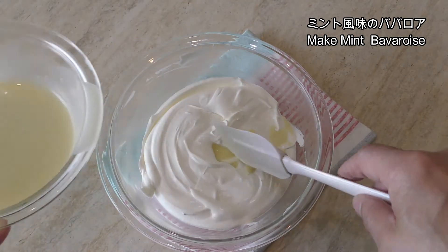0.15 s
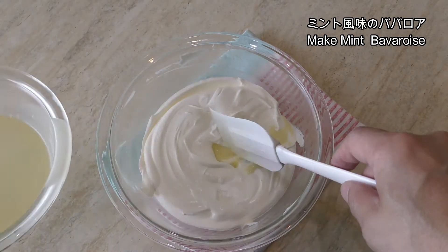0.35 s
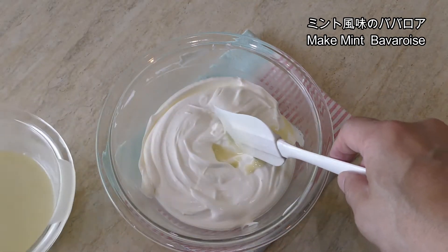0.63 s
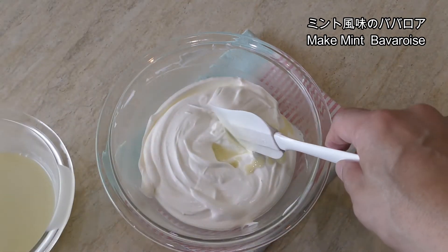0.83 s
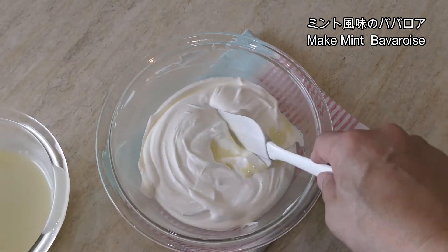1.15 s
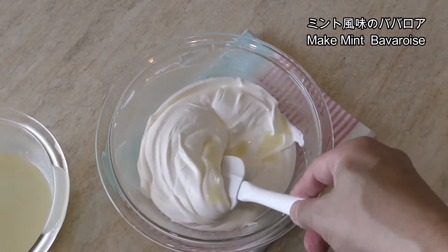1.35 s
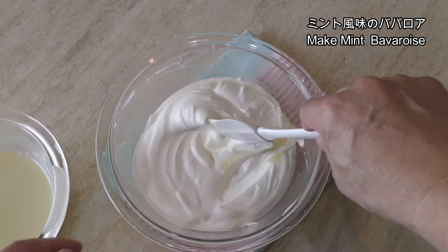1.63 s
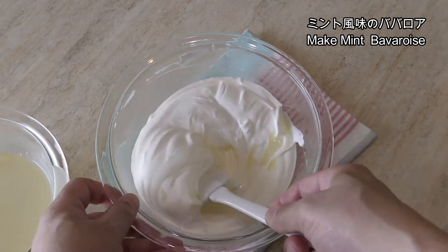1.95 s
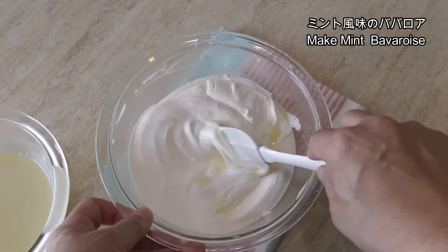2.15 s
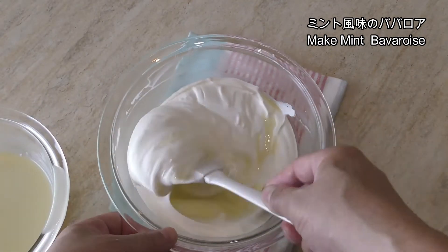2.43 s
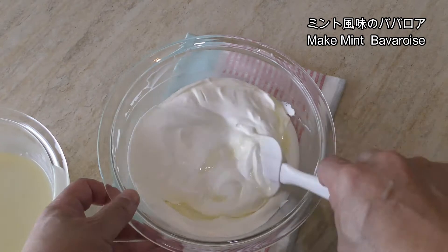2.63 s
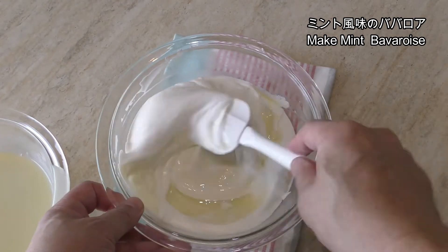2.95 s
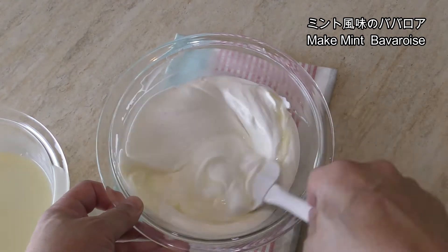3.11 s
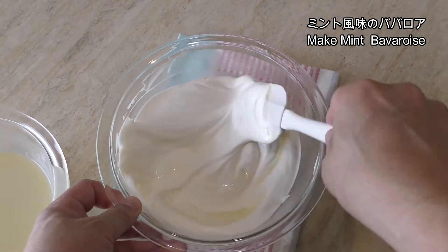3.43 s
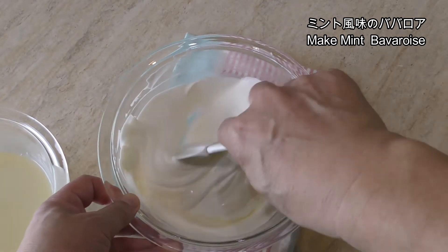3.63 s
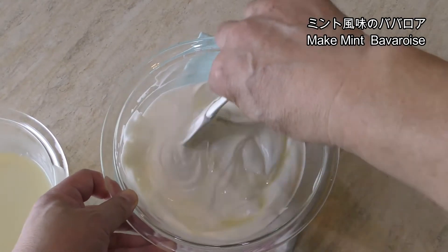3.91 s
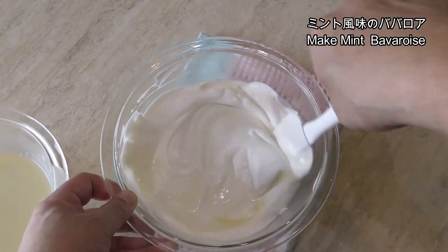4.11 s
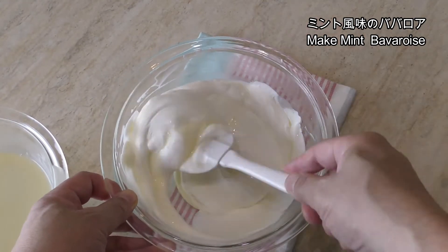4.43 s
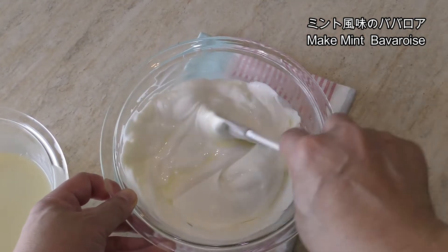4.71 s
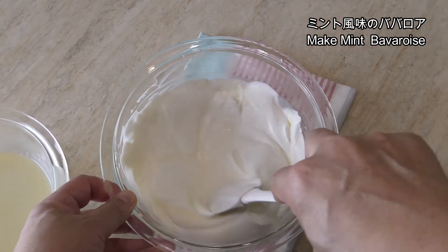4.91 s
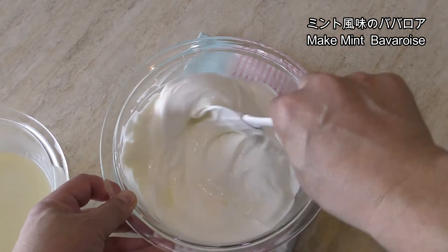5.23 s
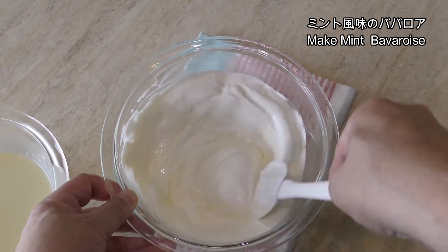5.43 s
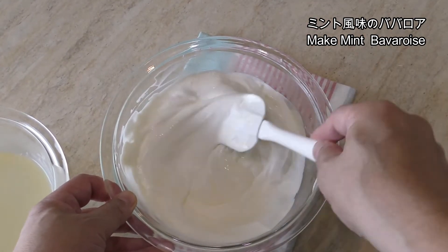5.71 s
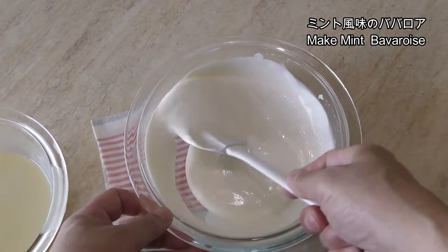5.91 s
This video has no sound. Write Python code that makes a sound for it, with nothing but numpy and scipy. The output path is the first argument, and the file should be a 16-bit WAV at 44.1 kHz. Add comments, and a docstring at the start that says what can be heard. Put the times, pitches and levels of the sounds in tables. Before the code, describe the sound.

A small kitchen, heard closely in stereo, with soft low room noise and a thin, faint appliance whine throughout. A barely audible knock fades at the start. At 0.74 s a glass bowl holding liquid lands on a hard counter with the loudest clack, a short glassy rattle and a low jolt; weaker contacts follow at 0.8 s, two faint foot scrapes at 0.9 and 1.0 s, and a second firm clack at 1.04 s. From 1.1 s a soft spatula makes dull, rounded thuds on a towel-cushioned bowl, around 1.7, 2.2, 2.7 and 3.1 s, among small skipping ticks. A faint rim brush comes at 1.9 s, bright short clinks at 2.7 and 3.16 s. Foamy swishes begin at 2.1 s. After 3.5 s it is sparser: drier, faint strokes, a tick at 4.6 s, bumps at 4.75 and 5.7 s, and a last wet swish near 5.9 s.

```python
"""In a kitchen, a glass bowl is set down on a counter; then a spatula folds whipped cream in a second glass bowl.
The landings and clinks are modal synthesis: impacts set decaying modes of glass and slab ringing.
The soft blade thuds on a bowl resting on a towel, as damped modes; the handle ticks, as short pulses.
The landed bowl's foot scrapes twice, then the cream swishes and crackles: random grains filtered into bands.
A small room answers each blow with echoes, standing waves and a diffuse tail; an appliance hums in it."""
import sys
import numpy as np
from scipy import signal
from scipy.fft import rfft, irfft, next_fast_len
from scipy.io import wavfile
from scipy.ndimage import uniform_filter1d, map_coordinates

SR = 44100
rng = np.random.default_rng(int(sys.argv[2]) if len(sys.argv) > 2 else 0)


def log_audio(samples):
    """Write samples as a 16-bit WAV file to the path given in sys.argv[1]."""
    # one column per channel
    frames = np.atleast_2d(samples).T
    # limit to full scale, then quantise
    limited = np.clip(frames, -1, 1)
    pcm = np.round(limited * 32767).astype(np.int16)
    wavfile.write(sys.argv[1], SR, pcm)


N = 267025  # length of the scene in samples

# low modes of the counter slab: (f/Hz, level/dB over the ring, t60/s)
COUNTER = [(143.3, 3, 0.23), (198, 6, 0.19)]


def slab_boom(t):
    """Modal decay: each low mode of the slab is a sine with an exponential envelope."""
    return sum(amp(db - 60 * t / t60) * np.sin(2 * np.pi * hz * t) for hz, db, t60 in COUNTER)


# spectrum of the dense ringing of glass and counter: (f/Hz, relative level/dB)
RATTLE = [(150, -30), (250, 7), (392, -1.5), (606, -5.5), (733, -9), (967, 3), (1350, -5.5), (1550, 1.5),
          (2150, -8.5), (2380, -8.5), (3200, -9.5), (4010, -14), (4450, -17), (12800, -31), (15800, -39)]


def rattle(t):
    """High modal density: many overlapping modes sound as decaying coloured noise."""
    # the foot of the bowl chatters in many small uneven contacts
    chatter = amp(2 * unit(uniform_filter1d(rng.standard_normal(len(t)), size=60)))
    noise = spread(rng.standard_normal((2, len(t))), [(300, 0.9), (2000, 0.58), (10000, 0.89)])
    return coloured(chatter * noise, RATTLE) * amp(3.0 - 60 * t / 0.22)


# spectrum of the low jolt: (f/Hz, relative level/dB)
SHUDDER = [(25, -22), (50, -13), (75, -2), (110, -5), (150, -1), (260, -24), (600, -70), (2000, -120)]


def shudder(t):
    """Negative correlation: a decaying low rumble, largely in opposition between left and right."""
    noise = spread(rng.standard_normal((2, len(t))), [(60, -0.55)])
    return coloured(noise, SHUDDER) * amp(-7.0 - 60 * t / 0.35)


# the bowl lands on the counter: (t/s, relative contact level/dB, relative ring level/dB)
LANDINGS = [(0.7434, -8, -29), (0.7894, -23, -42), (0.8109, -17.5, -33), (1.0443, -11.5, -28.5)]
# spectrum of the hard contact: (f/Hz, relative level/dB)
CONTACT = [(100, -22.5), (400, 2), (650, -16.5), (930, 5.5), (1600, -4.5), (2400, -6.5), (3200, -23.5),
           (4200, -17.5), (7000, -34), (15000, -32.5)]
# modes of the landed bowl, loaded with liquid: (f/Hz, relative level/dB, t60/s)
LANDED_GLASS = [(878, -5, 0.2), (980, -4, 0.12), (1150, -3.5, 0.32), (1286, -6, 0.19), (1450, -8.5, 0.33),
                (1550, -4, 0.13), (1650, -6, 0.14), (1970, 1, 0.089), (2332, -6, 0.21), (2460, -17, 0.19),
                (3340, -16, 0.17), (4030, -15, 0.23), (4030, -16, .18), (4230, -23, 0.2)]


def landings():
    """Impact excitation: a short hard contact sets bowl and slab ringing together, with a low jolt."""
    out, t = np.zeros((2, N)), np.arange(SR // 2) / SR
    onset = 1 - np.exp(-t / 0.0028)
    for s, contact_db, ring_db in LANDINGS:
        blow = amp(ring_db - 8.5) * ringing(t, LANDED_GLASS, scatter_db=2)
        add(blow, 0, amp(contact_db - 1.5) * click(CONTACT, ripple_db=1.0))
        body = amp(ring_db) * (slab_boom(t) + rattle(t) + shudder(t))
        add(out, s, in_room(blow, wet_db=-9.0, echo_db=-22))
        add(out, s, body * onset)
    return out


# the bowl rocking on its towel: (multiple of the thud pitch, mean level/dB, swell/s)
ROCKING = [(0.701, -14, 0.0026), (1, -2, 0.0026), (1.55, -19.5, 0.00415)]


def rocking(t, hz):
    """Damped modes: the bowl on its towel sways at hz and its multiples, at new strengths each time."""
    return sum(amp(level + rng.normal(0, 1)) * swell(t, hz * multiple, rise)
               for multiple, level, rise in ROCKING)


# modes of the bowl wall damped by cream: (mean f/Hz, mean level/dB, swell/s)
WALL = [(744, -21.5, 0.0046), (964, -0.5, 0.0014), (1180, -5.5, 0.00088), (1670, -11, 0.00047)]


def wall_knock(t):
    """Damping: the cream chokes each wall mode; pitch and strength vary per knock."""
    knock = np.zeros(len(t))
    for hz, level, rise in WALL:
        strength = amp(level + rng.normal(0, 3.6))
        knock += strength * swell(t, hz * (1 + rng.normal(0, 0.025)), rise)
    return knock


# the blade meets the bowl:
# (t/s, relative thud level/dB, thud f/Hz, relative wall knock level/dB, rebound share 0-1)
THUDS = [(1.135, -15.5, 269, -29, 0), (1.721, -19, 271.6, -38.5, 0.12), (2.1966, -20, 273, -35, 0.07),
         (2.586, -26, 342, -31.5, 0.46), (2.6834, -22.5, 273, -29, 0), (3.105, -24.5, 269, -35, 0),
         (3.603, -36, 280, -46, 0.1), (3.946, -34, 281, -40.5, 0), (4.746, -19.5, 234, -39, 0.64),
         (5.704, -26, 263, -44, 0.07)]
REBOUND_S, REBOUND_HZ = 0.00952, 410.2  # a tipped bowl drops back this much later, rocking at this pitch


def thuds():
    """Compliant support: the blade knocks the wall, the whole bowl rocks, and drops back if tipped."""
    out, t = np.zeros((2, N)), np.arange(SR // 8) / SR
    # a small bowl radiates no deep bass, and the towel swallows the overtones
    radiation = signal.butter(4, [150, 520], "band", fs=SR, output="sos")
    for s, db, hz, wall_db, rebound in THUDS:
        rock = rocking(t, hz)
        drop = np.pad(rocking(t, REBOUND_HZ), (round(REBOUND_S * SR), 0))[:len(t)]
        thud = -amp(db) * signal.sosfilt(radiation, rock + rebound * drop)
        add(out, s, in_room(thud, wet_db=-11.5, echo_db=0.5))
        add(out, s, in_room(amp(wall_db) * wall_knock(t), wet_db=-3.5, echo_db=0))
    return out


# handle taps and popping air pockets:
# (t/s, relative body level/dB, snap level/dB over the body, skip/s; 0 = a clean contact)
TICKS = [(1.53, -40.5, -28, 0), (2.132, -25.5, -22, 0.011), (2.1379, -22.5, -17.5, 0.0029),
         (2.158, -34, -11, 0), (2.333, -31, -28, 0.002), (2.5855, -22, -13, 0.0056),
         (2.978, -35, -17, 0.0013), (2.989, -31, -4.5, 0.0067), (3.273, -33, -11.5, 0),
         (3.416, -41, -17, 0), (3.479, -40, -18, 0.00068), (3.623, -44, -4, 0), (4.5746, -28, -18, 0),
         (4.747, -51, 6.5, 0), (5.703, -19, -38, 0.0084)]
# spectra of a tap's body, its crisp edge and its snap: each (f/Hz, relative level/dB)
TICK = [(60, -58), (300, -22), (650, -8), (950, 1.5), (1400, -2), (2200, -0.5), (2800, -5.5), (4000, -27),
        (6500, -59), (15000, -60)]
CRISP = [(200, -53), (1200, -27), (2500, 11), (3400, 6.5), (4600, -12), (5600, -24), (12000, -36)]
SNAP = [(300, -59), (2000, -42), (4500, 7), (6000, 3), (11000, -1.5), (15500, -8)]
CRISP_DB = -5.5  # crisp edge over the body, dB
GRAZE_DB, BOUNCE_DB = -15, -8  # the graze before a skipping tap and the bounce after it, over the tap, dB
BOUNCE_SHRINK = .55  # second flight time over the first


def ticks():
    """Contact pulses: body, edge and snap in one click; a skipping handle grazes, strikes, bounces once."""
    out = np.zeros((2, N))
    for s, db, snap_db, skip in TICKS:
        contacts = [(0.00014, 0)]  # (delay/s, level/dB)
        if skip > 0:
            contacts += [(-skip, GRAZE_DB), (BOUNCE_SHRINK * skip, BOUNCE_DB)]
        for delay, contact_db in contacts:
            tick = click(TICK, ripple_db=3.5)
            tick += amp(CRISP_DB) * click(CRISP, ripple_db=1.0)
            tick += amp(snap_db) * click(SNAP, ripple_db=4.5)
            add(out, s + delay, in_room(amp(db + contact_db) * tick, wet_db=-6.0, echo_db=-0.5))
    return out


# hard contacts with the rim: (t/s, relative ring level/dB, relative knock level/dB)
CLINKS = [(2.7265, -28, -28.5), (3.159, -32.5, -36.5)]
# spectrum of the body of a rim contact: (f/Hz, relative level/dB)
KNOCK = [(120, -27), (290, 5.5), (520, -24), (1000, 5.5), (1600, -7), (2400, -2.5), (3000, -11.5),
         (3700, -4), (4600, -25), (15000, -44)]
# modes of the mixing bowl: (f/Hz, struck level/dB, brushed level/dB, t60/s when struck)
GLASS = [(1890, -20, -18, .16), (2020, -12, 6, 0.18), (2400, -25, -25, .1), (3520, -3, -25, 0.028),
         (3740, 0, -3.5, 0.075), (3830, -6, -16, 0.046), (5770, -23, -14, 0.19), (5850, -23, -17, .07),
         (8080, -33.5, -20, 0.25), (9540, -34, -18, .1), (10500, -40, -9, .12)]
# the handle brushes the rim: (t/s, swell/s, relative level/dB)
BRUSH = (1.918, 0.025, -62)
# a faint knock on the lifted bowl dies away: (f/Hz, mean level/dB, t60/s)
FADING = [(357, -47, 0.13), (564, -55.5, 0.26), (1312, -45, 0.15), (1504, -52, 0.11), (2600, -56, 0.091),
          (3330, -59, 0.092), (5100, -57, 0.083)]


def clinks():
    """Modal excitation: the rim, clear of the cream, rings in glass modes when struck or brushed."""
    out, t = np.zeros((2, N)), np.arange(SR // 2) / SR
    struck = [(hz, db, t60) for hz, db, _, t60 in GLASS]
    for s, ring_db, knock_db in CLINKS:
        ring = ringing(t, struck, scatter_db=1.0) * (1 - np.exp(-t / 0.0011))
        knock = coloured(rng.standard_normal(len(t)), KNOCK) * amp(-60 * t / 0.036)
        add(out, s, in_room(amp(ring_db) * ring, wet_db=-16.5, echo_db=-18))
        add(out, s, in_room(amp(knock_db) * knock, wet_db=-3.5, echo_db=-9))
    # light friction feeds the modes in other proportions than a blow, and the ring swells
    s, rise, level = BRUSH
    brushed = sum(amp(level + db) * swell(t, hz, rise) for hz, _, db, _ in GLASS)
    brushed *= amp(3.7 * wobble(110)[:len(t)])  # the handle catches and slips
    add(out, s, in_room(brushed, wet_db=-3.0, echo_db=-12))
    fading = ringing(t, FADING, scatter_db=1) * (1 - np.exp(-t / .004))
    add(out, 0, in_room(fading, wet_db=-7.5, echo_db=-12))
    return out


def grains(spectrum, rate):
    """Shot noise: random bursts, rate a second on average and of uneven strength, take a spectrum."""
    happens = rng.random(N) < rate / SR
    strength = amp(2 * rng.standard_normal(N))
    bursts = happens * strength * rng.standard_normal((2, N))
    return coloured(spread(bursts, [(500, 1.0), (4000, 0.85), (12000, 1.0)]), spectrum)


# friction strokes: first the landed bowl's foot scrapes the counter twice (.89, .982 s),
# then the blade sweeps through the cream: (start t/s, length/s, relative level/dB,
# mid-stroke wetness: about -1 = dry contact, 1 = deep in foam)
STROKES = [(.89, 0.058, -56, -.4), (.982, .058, -61, -0.39), (2.08, 0.23, -61, 0.93),
           (2.41, 0.13, -61.5, 0.54), (2.757, 0.15, -62.5, .45), (3.203, 0.095, -66, -0.3),
           (3.6, .2, -61.5, -.1), (4.277, 0.21, -63.5, -0.4), (5.123, 0.11, -71.5, -1.24),
           (5.55, 0.12, -62.5, -0.67), (5.868, 0.13, -60, .55)]
# spectra of dry rubbing, squeezed foam, fine crackle and low slop: each (f/Hz, relative level/dB)
RUB = [(60, -45), (300, -17), (650, -12.5), (1000, 2.5), (1350, -3.5), (1900, -9.5), (3000, -27),
       (8000, -55)]
SQUISH = [(200, -50), (900, -19), (1500, -1), (2700, -2), (3800, -9), (6000, -32), (12000, -45)]
FIZZ = [(400, -45), (2500, -3), (4500, -0.5), (8000, -1.5), (12000, -4.5), (15500, -12.5)]
SLOP = [(80, -20), (220, -6.5), (370, 2), (600, -24.5), (2000, -60)]
WETTING = 0.36  # wetness gained from the start of a stroke to its end, as when the blade digs in
RUB_DB, SQUISH_DB, FIZZ_DB, SLOP_DB = 0.5, -.5, -9, 2.5  # layers over the stroke's level at wetness 0, dB
# change in dB per unit of wetness: foam mutes the rub and feeds the fizz
RUB_WET_DB, SQUISH_WET_DB, FIZZ_WET_DB = -9.5, 1.5, 8.5
EDGE = 3.4  # steepness with which a stroke swells and eases off


def friction_strokes():
    """Friction noise: grains of rub, squish, fizz and slop, for two scrapes and then sweeps in the cream."""
    t, levels = np.arange(N) / SR, np.zeros((4, N))
    for start, length, db, wetness in STROKES:
        progress = np.clip((t - start) / length - .5, -1, 1)  # 0 halfway through the stroke
        pressure = np.exp(-np.abs(1.646 * progress) ** EDGE)
        wet = wetness + WETTING * progress
        layers_db = np.array([RUB_DB + RUB_WET_DB * wet, SQUISH_DB + SQUISH_WET_DB * wet,
                              FIZZ_DB + FIZZ_WET_DB * wet, np.full(N, SLOP_DB)])
        levels += amp(db) * pressure * amp(layers_db)
    rub, squish, fizz, slop = levels * amp(wobble(25))  # the friction is uneven
    return (rub * grains(RUB, rate=1800) + squish * grains(SQUISH, rate=3200)
            + fizz * grains(FIZZ, rate=9000) + slop * grains(SLOP, rate=540))


# colour and decay of the diffuse tail: (f/Hz, relative level/dB) and (f/Hz, t60/s)
DIFFUSE = [(80, -11), (200, 2.5), (450, 0), (620, 3), (900, -10.5), (3000, -1.5), (12000, -0.5)]
ROOM = [(150, 0.39), (400, 0.21), (1500, 0.26), (5000, 0.25), (14000, 0.13)]
# reflections from counter, cupboard and far wall: (t/s, relative gain)
ECHOES = [(.0095, 0.12), (.018, 0.085), (.05, .07)]
# standing waves of the room: (f/Hz, level/dB, t60/s)
STANDING = [(211.5, -6, .17), (261.3, -5, 0.19), (359, 1.5, 0.14), (443.3, -2, 0.18)]


def in_room(sound, wet_db, echo_db):
    """Convolution: a blow meets early echoes, standing waves and a new diffuse tail, in stereo."""
    hz, t, z = signal.stft(rng.standard_normal((2, SR // 2)), SR, nperseg=256)
    decay_db = 60 * t / along(ROOM, hz)[:, None]
    z = z * amp(along(DIFFUSE, hz)[:, None] - decay_db) * (1 - np.exp(-t / 0.0022))
    noise = signal.istft(z, SR, nperseg=256)[1]
    tail = spread(noise, [(300, 0.95), (1000, 0.85), (3000, 0.42), (10000, 0.99)])
    answer = amp(wet_db) * tail / np.linalg.norm(tail[0])
    answer[:, 0] += 1  # direct sound
    for s, gain in ECHOES:
        answer[:, round(s * SR)] += gain * amp(echo_db)
    t = np.arange(answer.shape[1]) / SR
    for hz, db, t60 in STANDING:
        decay = amp(-60 * t / t60)
        answer += amp(db) * 2 * decay / decay.sum() * np.cos(2 * np.pi * hz * t)
    return signal.fftconvolve(sound[None], answer, axes=1)


# spectrum of the room noise: (f/Hz, relative level/dB)
AIR = [(25, -12.5), (70, -5), (130, -3), (205, 0.5), (280, -3.5), (365, -2), (480, -10), (620, -27.5),
       (1000, -12.5), (1500, -15.5), (2600, -17.5), (4200, -27), (6200, -35), (11000, -29), (15800, -30.5)]
AIR_DB = -55.3  # rms level of the room noise, dB
# left-right likeness of the noises: (f/Hz, correlation)
ALIKE = [(60, -0.057), (130, 0.25), (290, 0.67), (640, 0.75), (1410, 0.52), (3100, 0.099), (6820, 0.95),
         (15000, 0.28)]
# appliance noise bands: (centre f/Hz, half-width at half gain/Hz, rms level/dB)
DRONE = [(690, 39, -75.5), (1940, 250, -70), (2708, 40, -75.5), (7380, 100, -86.5), (10130, 46, -83.5)]
# thin whine of the appliance: (f/Hz, mean level/dB)
HUM = [(1001, -82), (1890, -69), (1949, -78.5), (2008, -77.5), (2126, -73.5)]


def kitchen():
    """Stationary noise and tones: steady room noise, with the bands and wavering whine of an appliance."""
    t = np.arange(N) / SR
    noise = lambda: spread(rng.standard_normal((2, N)), ALIKE)
    out = amp(AIR_DB) * coloured(noise(), AIR)
    for hz, width, db in DRONE:
        band = filtered(noise(), lambda f: 1 / (1 + ((f - hz) / width) ** 4))
        out += amp(db) * unit(band)
    for hz, db in HUM:
        level = amp(db + 0.33 * wobble(3.8)) * np.sqrt(2)
        out += level * np.sin(2 * np.pi * hz * t + .5 * wobble(10))
    return out


def ringing(t, modes, scatter_db):
    """Modal superposition: decaying modes, struck at new strengths and phases each time."""
    return sum(amp(db + rng.normal(0, scatter_db) - 60 * t / t60)
               * np.sin(2 * np.pi * (hz * t + rng.random())) for hz, db, t60 in modes)


def swell(t, hz, rise):
    """Critically damped envelope on a sine: it reaches 1 after rise seconds, then dies away."""
    return t / rise * np.exp(1 - t / rise) * np.sin(2 * np.pi * hz * t)


def click(spectrum, ripple_db, size=2048):
    """Minimum phase: a causal pulse of peak 1; each contact point ripples the spectrum its own way."""
    hz = np.fft.rfftfreq(size, 1 / SR)
    ripple = uniform_filter1d(rng.standard_normal(len(hz)), size=7)
    ripple = unit(uniform_filter1d(ripple, size=5))
    cepstrum = irfft(np.log(amp(along(spectrum, hz) + ripple_db * ripple)))
    cepstrum[1:size // 2] *= 2  # fold the cepstrum onto positive time
    cepstrum[size // 2 + 1:] = 0
    pulse = irfft(np.exp(rfft(cepstrum)))
    return pulse / np.abs(pulse).max()


def spread(pair, alike):
    """Interchannel correlation: two unrelated signals become left and right of the given likeness."""
    turn = lambda hz: np.arccos(np.clip(along(alike, hz), -1, 1)) / 2
    mid, side = filtered(pair, lambda hz: np.array([np.cos(turn(hz)), np.sin(turn(hz))]))
    return np.array([mid + side, mid - side])


def coloured(x, spectrum):
    """Spectral shaping: x filtered by a spectrum in dB, at rms 1."""
    return unit(filtered(x, lambda hz: amp(along(spectrum, hz))))


def filtered(x, response):
    """Convolution theorem: multiply the spectrum of x by a response of frequency."""
    n = x.shape[-1]
    m = next_fast_len(n + 8192)
    return irfft(rfft(x, m) * response(np.fft.rfftfreq(m, 1 / SR)), m)[..., :n]


def wobble(rate):
    """Slow randomness: a smooth curve through rate random knots a second."""
    knots = rng.standard_normal(int(N * rate / SR) + 4)
    return map_coordinates(knots, [np.arange(N) * rate / SR])


def along(points, hz):
    """Logarithmic frequency scale: interpolate (f/Hz, value) points."""
    f, v = np.transpose(points)
    return np.interp(np.log(hz + 1), np.log(f + 1), v)


def amp(db):
    """Level to amplitude: decibels become gain."""
    return 10 ** (np.asarray(db) / 20)


def unit(x):
    """Root mean square: scale to rms 1."""
    return x / np.sqrt(np.mean(x ** 2) + 1e-20)


def add(track, s, sound):
    """Superposition: mix a sound into a track at s seconds."""
    start = max(round(s * SR), 0)
    part = sound[..., :N - start]
    track[..., start:start + part.shape[-1]] += part


def scene():
    """Level difference: both bowls stand just left of the middle, over the kitchen background."""
    bowls = landings() + thuds() + ticks() + clinks() + friction_strokes()
    return bowls * amp([[.3], [-.3]]) + kitchen()


def record(dry):
    """Band limitation: nothing from 15850 Hz up is kept."""
    return filtered(dry, lambda hz: hz < 15850)


dry = scene()
out = record(dry)
log_audio(out)
```